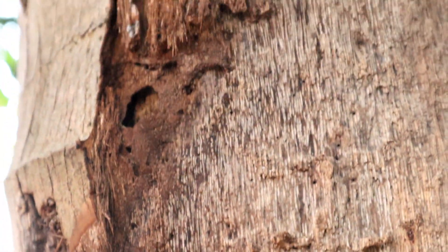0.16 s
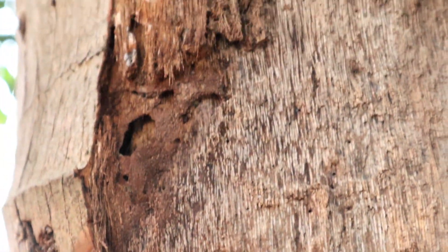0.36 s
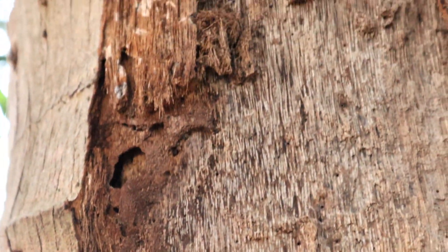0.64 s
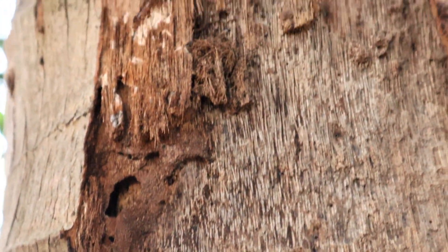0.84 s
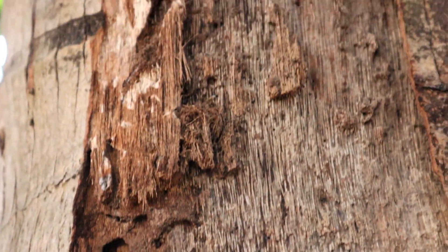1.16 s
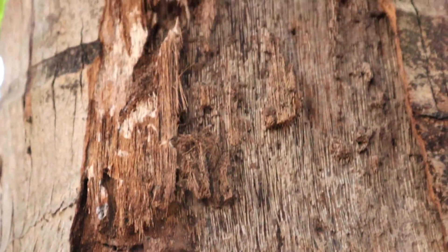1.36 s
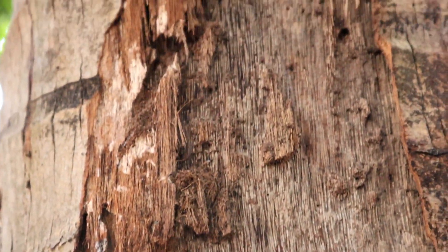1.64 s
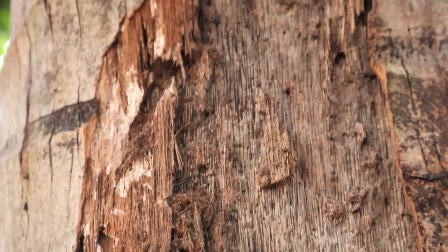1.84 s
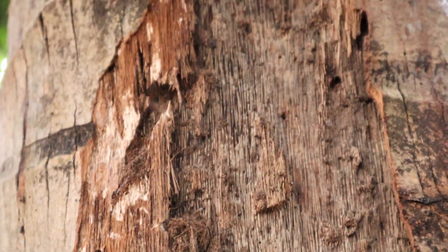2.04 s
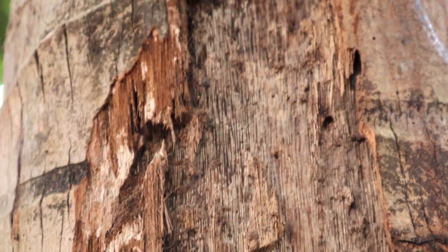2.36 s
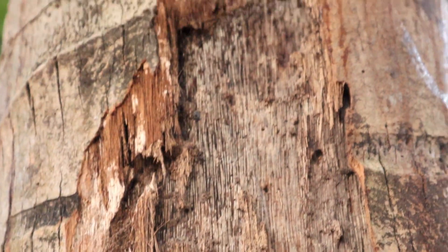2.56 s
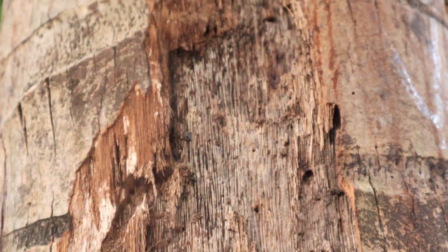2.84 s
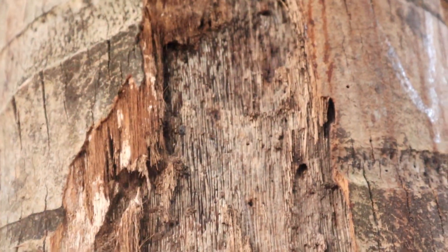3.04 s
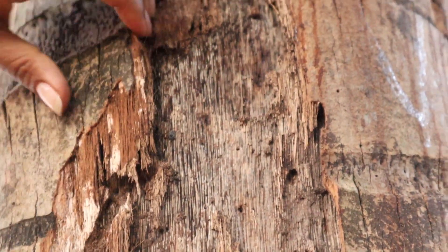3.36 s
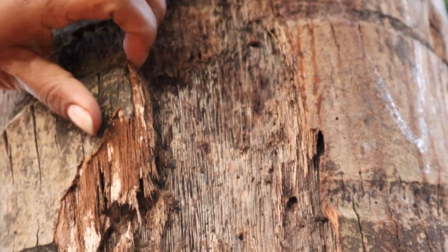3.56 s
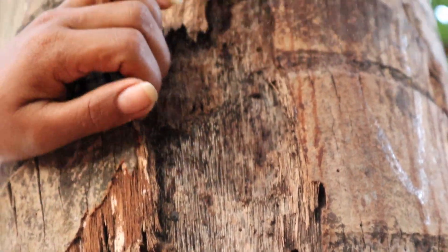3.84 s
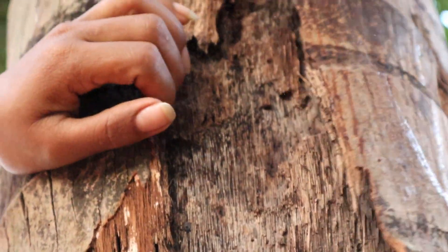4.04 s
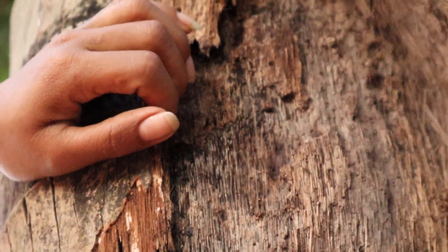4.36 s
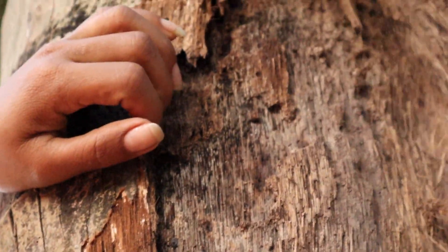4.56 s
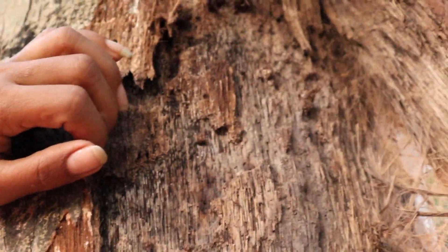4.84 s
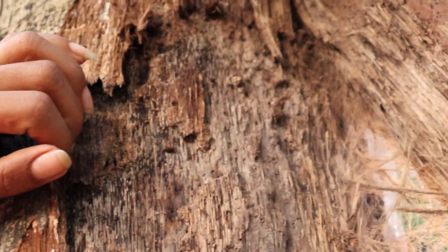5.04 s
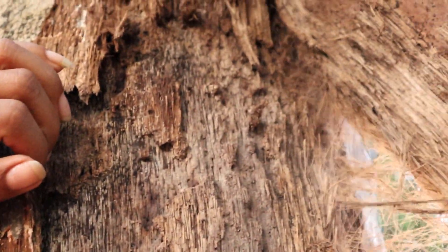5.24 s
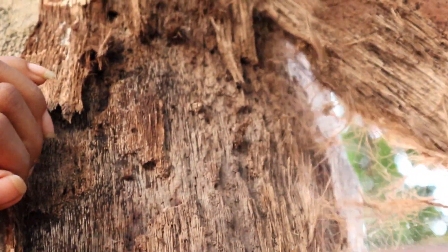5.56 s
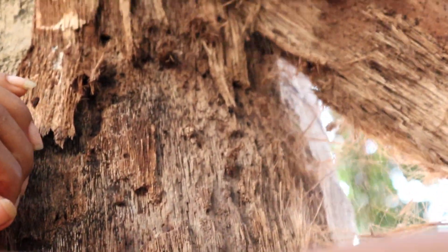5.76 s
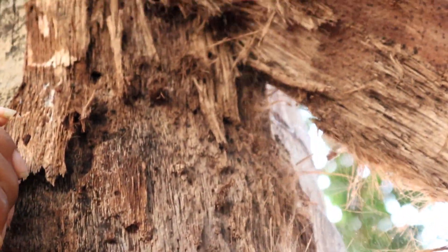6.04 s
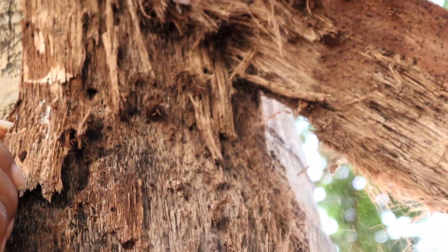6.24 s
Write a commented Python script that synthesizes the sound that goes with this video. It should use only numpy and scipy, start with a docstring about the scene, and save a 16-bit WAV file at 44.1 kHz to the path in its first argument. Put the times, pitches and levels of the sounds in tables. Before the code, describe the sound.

A hand tears dry rotten wood from a tree trunk, very close to the microphone. A few small ticks give way to dense runs of crunching and sharp fibre snaps, with slight hollow knocks. After a lull, the hand brushes over bark, then come hard snaps and a soft bump. Lighter, brighter tearing and trickling crumbs follow. Faint leaves, a distant rumble and thin insect hiss lie behind.

```python
"""Dry rotten wood is pulled from a trunk by hand, outdoors, close to a pair of microphone ports.
Over leaves, far rumble, a drone and faint insects, crumbs trickle and single fibres snap.
From 0.6 s pulled bundles crunch in dense runs of tiny breaks, and the hollow trunk knocks along.
After a lull near 3 s the hand slides over the bark. Hard snaps and a bump follow at 4.1-4.4 s,
then lighter, brighter tearing from 5.3 s."""
import sys
import numpy as np
from scipy import signal
from scipy.io import wavfile
from scipy.ndimage import map_coordinates

SR = 44100
rng = np.random.default_rng(int(sys.argv[2]) if len(sys.argv) > 2 else 0)


def persist_wave(psi):
    """Save psi, clipped to +-1, as 16-bit WAV."""
    counts = np.round(np.clip(psi, -1, 1) * 32767).astype(np.int16)
    wavfile.write(sys.argv[1], SR, np.atleast_2d(counts).T)


N = 282240


def amp(db):
    """Decibels to gain."""
    return 10 ** (np.asarray(db) / 20)


def rms_one(x):
    """Scale to unit power."""
    return x / np.sqrt(np.mean(x ** 2) + 1e-20)


def in_time(rows):
    """Curve columns at every sample."""
    s, *columns = np.transpose(rows)
    return [np.interp(np.arange(N) / SR, s, c) for c in columns]


def at_hz(points, hz):
    """Read a spectrum on a log-frequency axis."""
    knots_hz, values = np.transpose(points)
    return np.interp(np.log(hz), np.log(knots_hz), values)


def drift(rate_hz):
    """Slow random wander, unit RMS."""
    r = np.exp(-40 * np.pi * rate_hz / SR)
    slow = signal.lfilter([1], [1, -2 * r, r * r], rng.standard_normal(N // 20 + 4002))[4000:]
    return np.interp(np.arange(N) / 20, np.arange(len(slow)), rms_one(slow))


def ring(force, hz, t60_s):
    """One damped mode."""
    r, w = amp(-60 / (t60_s * SR)), 2 * np.pi * hz / SR
    return signal.lfilter([0, np.sin(w)], [1, -2 * r * np.cos(w), r * r], force + 1e-18)


def band(x, low_hz, high_hz):
    """Band-pass."""
    return signal.sosfilt(signal.butter(2, [low_hz, high_hz], "band", fs=SR, output="sos"), x)


# (frequency [Hz], spectral density [dB])
AIR_SPECTRUM = [(20, -29), (48, 5.5), (163, -1.5), (400, 0.5), (590, -2), (6540, -6.5), (12000, -21),
                (16000, -41)]
# (frequency [Hz], left-right correlation [-1..1])
AIR_CORRELATION = [(60, 1), (180, 0.4), (550, -0.35), (1650, -0.74), (4970, -0.8), (15000, -0.88)]
def leaves(level_db=-48.5, patchy_db=4.5):
    """Leaves and distant air: half-octave noise bands, each wandering in level."""
    out, edges_hz = 0, 22 * 2 ** np.arange(0, 9.6, .5)
    white = rng.standard_normal((2, 2, N))
    for k, (low, high) in enumerate(zip(edges_hz, edges_hz[1:])):
        mid, side = band(white[k % 2], low, high)
        hz = np.sqrt(low * high)
        alike = at_hz(AIR_CORRELATION, hz)
        gain = amp(at_hz(AIR_SPECTRUM, hz) + patchy_db * drift(6.4))
        out += gain * (np.sqrt(1 + alike) * mid + np.sqrt(1 - alike) * side * [[1], [-1]])
    return amp(level_db) * rms_one(out)


# (time [s], level [dB])
RUMBLE_LEVEL = [(0, -71.5), (3.4, -51.5), (4.3, -57), (6.4, -50.5)]
def rumble():
    """Wind and far traffic: low, swelling noise."""
    gain = amp(in_time(RUMBLE_LEVEL)[0] + 7.4 * drift(1.1))
    return gain * rms_one(band(rng.standard_normal(N), 26, 188))


def drone(hz=155, width_hz=18, level_db=-64):
    """A far hum: narrow, low noise."""
    hum = band(rng.standard_normal(N), hz - width_hz / 2, hz + width_hz / 2)
    return amp(level_db + 2 * drift(1)) * rms_one(hum)


def insects(hz=6600, width_hz=550, level_db=-65):
    """Insects: a thin, high hiss in stereo."""
    hiss = band(rng.standard_normal((2, N)), hz - width_hz / 2, hz + width_hz / 2)
    return amp(level_db + drift(2.5)) * rms_one(hiss)


# (time [s], level [dB])
CRUMB_LEVEL = [(0, -48.5), (.5, -51.5), (.8, -44.5), (1.2, -57), (1.6, -79), (1.8, -48), (2.2, -98.5),
               (2.6, -59.5), (3.3, -60), (3.95, -72), (4.55, -45), (4.8, -50), (5.2, -44.5), (5.8, -46),
               (6.4, -47)]
def crumbs(treble_db=8, smooth=0.38):
    """Effort of loose crumbs and strained fibres between pulls."""
    return [(in_time(CRUMB_LEVEL)[0], treble_db, smooth)]


def effort():
    """Efforts add in power; the loudest leads treble and smoothness (0 breaks, 1 rubbing)."""
    level_db, treble_db, smooth = map(np.array, zip(*crumbs(), *slides(), *pulls()))
    power = amp(2 * level_db)
    total = power.sum(axis=0)
    return 10 * np.log10(total), treble_db @ power / total, smooth @ power / total


# (frequency [Hz], spectral density [dB])
SPLINTER_SPECTRUM = [(300, -25), (837, -10), (1700, 3), (2270, -2.5), (2980, 3), (4600, -7.5), (7500, -7.5),
                     (13000, -28.5)]
# trunk response to crunch and snaps: (time [s], gain [dB])
TRUNK_COUPLING = [(0, -20), (.7, -9.5), (3.3, -7.5), (4.1, -16), (4.5, -1), (4.65, -4), (6.4, -23)]
def crunch(breaks_per_s=240, uneven_db=4.0, clumps_db=3.0, break_s=0.0008, cycles=7):
    """Clumps of tiny breaks, blended with rubbing, ring the splinters and the trunk."""
    level_db, treble_db, smooth = effort()
    breaks = rng.random(N) < breaks_per_s * amp(clumps_db * drift(25)) / SR
    sizes = breaks * amp(uneven_db * np.minimum(rng.exponential(1, N), 2.5))
    favoured = rng.integers(0, 5, N)   # splinter size range per break
    white, plain, tilted = rng.standard_normal((2, N)), 0, 0
    fade = np.exp(-1 / (break_s * SR))
    rubbing = smooth * amp(1.2 * drift(32.5))
    sprays = [signal.lfilter([1], [1, -fade], sizes * (0.33 + (favoured == k))) for k in range(5)]
    forces = [(1 - smooth) * rms_one(spray) + rubbing for spray in sprays]
    for k, hz in enumerate(np.geomspace(300, 13000, 20)):
        splinter = rms_one(ring(white[k % 2] * forces[k // 4], hz, cycles / hz))
        splinter *= amp(at_hz(SPLINTER_SPECTRUM, hz)) * np.sqrt(hz)
        plain += splinter
        tilted += splinter * amp(treble_db * np.clip(np.log2(hz / 2300) / 2.42, 0, 1))
    knocking = amp(in_time(TRUNK_COUPLING)[0]) * rms_one(trunk(white[1] * forces[0]))
    wood = band(tilted, 590, 21000) / plain.std() + knocking
    rasp = 1.24 * smooth ** 2 * amp(np.minimum(treble_db, 0)) * band(wood, 3160, 7200)
    return amp(level_db) * band(wood + rasp, 180, 18800)


# (frequency [Hz], gain [dB], t60 [s])
TRUNK_MODES = [(175, -15, 0.038), (276, -22.5, 0.039), (372, -12, 0.042), (500, 3.5, 0.0048),
               (676, 0.5, 0.013)]
def trunk(force):
    """The hollow trunk answers with short, low modes."""
    return sum((-1) ** k * amp(db) * ring(force, hz, t60) for k, (hz, db, t60) in enumerate(TRUNK_MODES))


# (time [s], level [dB], ring [Hz], treble [dB])
FIBRE_SNAPS = [(0.005, -18.5, 1365, 14), (0.019, -14.5, 1330, 7), (0.025, -10.5, 2660, 3),
               (0.089, -15, 4204, 5.5), (0.101, -22.5, 786, 12.5), (0.303, -22, 1770, 19),
               (0.321, -19.5, 1870, 10.5), (0.372, -22, 2470, 10.5), (0.428, -8.5, 1110, 13),
               (0.677, -21.5, 1490, 14), (0.695, -17, 1260, -1), (0.711, -14.5, 1500, 15),
               (0.778, -20.5, 1690, 13), (0.836, -16.5, 2000, 7.5), (0.854, -6, 5260, -21),
               (0.861, -0.5, 5100, -13), (0.864, 0, 2390, -14), (0.885, -0.5, 1420, 0), (0.906, 6, 1720, 7),
               (0.932, -16, 2430, 1), (0.954, -10, 3120, -2), (0.966, -1.5, 1160, -3),
               (0.978, 2, 1720, 4.5), (0.997, -9, 1210, -1), (1.006, -0.5, 1770, -11),
               (1.04, 5.5, 1370, 0.5), (1.068, -0.5, 3820, -16), (1.1, -5.5, 4040, -2),
               (1.127, -3, 1940, 3), (1.145, -12.5, 640, -18), (1.159, -13, 1840, -21),
               (1.177, -7.5, 1500, -24), (1.197, -3, 2700, 0), (1.303, -12.5, 2930, 2),
               (1.327, 2.5, 3500, -17), (1.353, -7, 1370, 2), (1.376, -6.5, 1530, -15),
               (1.384, -9.5, 646, 10.5), (1.397, -10.5, 1860, -8), (1.458, -13.5, 2030, -2),
               (1.468, -3, 2270, 7), (1.731, -13.5, 1920, 0), (1.75, -3.5, 2080, -2),
               (1.942, 2.5, 1900, -4.5), (1.97, -8, 3100, -6), (1.976, -6.5, 1690, -5),
               (1.98, -8, 2900, -16), (1.991, -7, 1500, -8), (1.999, -10.5, 513, -3),
               (2.007, -6, 2530, -17), (2.043, -4, 660, -3), (2.053, -3.5, 5070, -30),
               (2.194, -32, 2750, 15), (2.23, -9.5, 2080, 2.5), (2.252, -5, 2050, -5),
               (2.261, -3.5, 1470, -7), (2.281, -8.5, 500, 4), (2.292, -5.5, 1570, 2.5),
               (2.323, -10, 3020, -16), (2.34, 3, 1530, 6), (2.397, -22, 1510, -10), (2.487, -4.5, 1410, 7),
               (2.518, -11.5, 650, 8.5), (2.73, -9.5, 586, 7), (2.736, -4.5, 1520, -13),
               (2.84, -21, 460, 1), (2.874, -20, 690, 0), (2.928, -16, 865, -30), (3.038, -7, 740, -22),
               (3.322, -12, 790, -6), (3.39, -13.5, 980, -9), (3.985, -16, 1390, -12),
               (4.005, -17.5, 1400, -25), (4.148, 5.5, 3200, -24), (4.15, -0.5, 1240, 0),
               (4.203, 6, 1270, 14), (4.256, -7, 1340, -24), (4.302, -13, 1010, 3.5),
               (4.338, -14.5, 2870, -11), (4.351, -19.5, 556, 0), (4.359, -10, 5100, -18),
               (4.373, -11, 635, -10), (4.386, -13, 1400, -3), (4.429, -17, 1280, -11),
               (4.442, -8.5, 1310, -27), (4.461, -6.5, 3400, -21), (4.488, -18, 1030, 4),
               (4.505, -19, 970, 1), (4.514, -16.5, 715, 12), (4.64, -5.5, 1850, 3.5),
               (4.73, -18, 1490, 0.5), (5.015, -15.5, 2670, -32), (5.144, -12.5, 2540, 1.5),
               (5.31, -13, 2190, -6), (5.337, -14.5, 3040, 1), (5.352, -2.5, 3100, -15),
               (5.376, -7.5, 3130, -12), (5.478, -16, 3360, -12), (5.556, -14, 3240, -3),
               (5.564, -13.5, 1280, 8.5), (5.578, -18, 1830, 10), (5.606, 0.5, 3380, -11),
               (5.617, -8.5, 1240, 6), (5.62, -7.5, 1800, -16), (5.633, -3.5, 1600, 13.5),
               (5.674, -7.5, 1730, 2), (5.688, -13, 3280, 2), (5.766, -19.5, 3100, 5.5),
               (5.809, -19.5, 1680, -5), (5.952, -15.5, 1460, -20), (5.997, -15.5, 1590, 2),
               (6.113, -6, 1870, -8), (6.125, -14.5, 3000, 10), (6.148, -18, 3200, 3),
               (6.173, -19, 2150, 7), (6.181, -10, 1970, -21), (6.21, -18.5, 770, 13.5),
               (6.265, -12.5, 3720, -7)]
def snaps(lead_s=0.0006, split_s=0.00086, crack_s=0.00048, dust_s=0.0071,
          ring_db=-3, crack_db=-8, dust_db=-15, knock_db=-16, cycles=10):
    """A fibre splits: a bright crack, a few cycles of the freed splinter, a knock, falling dust."""
    length = 2048
    out, knocks, t = np.zeros(N + length), np.zeros(N), np.arange(length) / SR
    noise = rng.standard_normal((len(FIBRE_SNAPS), 3, length))
    burst = t / split_s * np.exp(-2 * t / split_s)
    flash = t / crack_s * np.exp(-2 * t / crack_s) + 0.022 * np.exp(-t / (3 * split_s))
    for (s, level_db, hz, treble_db), (split, hiss, dust) in zip(FIBRE_SNAPS, noise):
        click = 2 * np.sign(split[0]) * (np.arange(length) == 12)
        main = rms_one(ring(split * burst + click, hz, cycles / hz))
        low = rms_one(ring(dust * burst, 0.52 * hz, cycles / hz / 2))
        high = rms_one(ring(hiss * burst, 1.71 * hz, cycles / hz / 2))
        coupling = amp(np.interp(s, *np.transpose(TRUNK_COUPLING)))
        body = band(main + coupling * low / 2 + 0.43 * high, hz / 3.22, 18000)
        body *= amp(ring_db) / abs(body).max()
        crack = band(hiss * flash, 2400, 8600)
        crack *= amp(treble_db + crack_db) / abs(crack).max()
        grit = amp(dust_db) * band(dust * np.exp(-t / dust_s), 360, 3000)
        start = max(round((s - lead_s) * SR), 0)
        out[start:start + length] += amp(level_db) * (body + crack + grit)
        knocks[start] += coupling * amp(level_db + knock_db + rng.standard_normal())
    return band(out[:N] + trunk(knocks), 300, 15000)


def rise_db(age_s, build_s):
    """The hand's force builds from silence to full."""
    return np.where(age_s < 0, -200, -21.5 * np.clip(1 - age_s / build_s, 0, 1))


# (time [s], hold [s], level [dB], treble [dB])
BARK_SLIDES = [(0.418, 0.027, -31.5, 14), (3.304, 0.033, -27, 6.5), (3.383, 0.016, -27, 2),
               (3.532, 0.017, -33.5, -3), (3.595, 0.039, -32.5, -1), (3.708, 0.022, -38, -6),
               (4.048, 0.062, -32.5, -42)]
def slides(attack_s=0.0066, fall_db_per_s=293, dust_db=-11, dust_db_per_s=48, smooth=1):
    """Effort of the hand sliding over bark; dust trickles on afterwards."""
    for s, hold_s, level_db, treble_db in BARK_SLIDES:
        age_s = np.arange(N) / SR - s
        after_s = np.maximum(age_s - attack_s - hold_s, 0)
        fall_db = np.maximum(-fall_db_per_s * after_s, dust_db - dust_db_per_s * after_s)
        yield level_db + rise_db(age_s, attack_s) + fall_db, treble_db, smooth


# (time [s], level [dB])
TRUNK_BUMPS = [(0.427, -20.5), (0.663, -14), (4.371, -20.5)]
def bumps(band_hz=(116, 450), gain_db=14):
    """The palm or a loose piece bumps the trunk softly, stirring its lowest modes."""
    blows = np.zeros(N)
    for s, level_db in TRUNK_BUMPS:
        blows[round(s * SR)] = amp(level_db + gain_db)
    return trunk(band(band(blows, *band_hz), *band_hz))


# (time [s], build-up [s], hold [s], level [dB], treble [dB])
BUNDLE_PULLS = [(0.59, 0.074, 0.049, -30.5, -3), (0.846, 0.033, 0.048, -19.5, 0),
                (0.943, 0.016, 0.054, -23.5, 4), (1.017, 0.054, 0.13, -33, 7.5),
                (1.305, 0.083, 0.065, -34.5, 7.5), (1.635, 0.023, 0.09, -48, 18),
                (1.9, 0.0042, 0.0092, -50, 26), (1.934, 0.034, 0.09, -26.5, 7.5),
                (2.2, 0.059, 0.087, -25.5, 13), (2.48, 0.003, 0.018, -32, 8),
                (2.727, 0.003, 0.0028, -28.5, -0.5), (2.825, 0.003, 0.0046, -30, -10),
                (2.861, 0.054, 0.0081, -33, 0.5), (3.94, 0.038, 0.09, -40, -20),
                (4.139, 0.002, 0.0054, -26.5, -5.5), (4.177, 0.009, 0.096, -23.5, -17.5),
                (4.312, 0.02, 0.17, -30.5, -2.5), (5.31, 0.062, 0.059, -41, 11.5),
                (5.431, 0.023, 0.052, -42.5, 12), (5.591, 0.0093, 0.064, -37, 16),
                (5.899, 0.0093, 0.12, -43, 2), (6.05, 0.046, 0.096, -38, 8)]
def pulls(fall_db_per_s=359, smooth=0.37):
    """Effort of fingers pulling a bundle of fibres until it gives."""
    for s, build_s, hold_s, level_db, treble_db in BUNDLE_PULLS:
        age_s = np.arange(N) / SR - s
        fall_db = -fall_db_per_s * np.clip(age_s - build_s - hold_s, 0, 1)
        yield level_db + rise_db(age_s, build_s) + fall_db, treble_db, smooth


# (time [s], left over right [dB], left lead [samples])
HAND_POSITION = [(0.2, 3.5, 6), (0.7, 0, 0.5), (2.0, 0, 0.5), (2.7, 2, 2), (3.7, 4, 5), (4.2, -1.5, 0.45),
                 (6.2, -1.5, -1.7)]
def at_ports(wood, echo_db=-11, treble_db=1, middle_db=-2):
    """Position sets pan and delay; the moving hand echoes; the housing colours the left port."""
    pan_db, lead = in_time(HAND_POSITION)
    n = np.arange(N)
    right = map_coordinates(wood, [n - lead - drift(100)], order=3)
    echo = amp(echo_db) * band(np.interp(n - 50 - 10 * drift(10), n, wood), 980, 5500)
    left = wood + (amp(treble_db) - 1) * band(wood, 7400, 19400)
    left += (amp(middle_db) - 1) * band(wood, 750, 3470)
    return np.array([(left + echo) * amp(pan_db / 2), (right - echo) * amp(-pan_db / 2)])


def scene():
    """Wood close by, the outdoors behind."""
    return at_ports(snaps() + crunch() + bumps()) + leaves() + rumble() + drone() + insects()


def record(dry):
    """The microphone lifts 11 kHz and fades above; the hardest snaps clip; the top is cut."""
    lifted = dry + 0.84 * band(dry, 9850, 13800)
    heard = signal.sosfilt(signal.butter(3, 13000, fs=SR, output="sos"), lifted)
    return signal.sosfilt(signal.cheby2(12, 60, 16300, fs=SR, output="sos"), np.clip(heard, -1, 1))


dry = scene()
out = record(dry)
persist_wave(out)
```